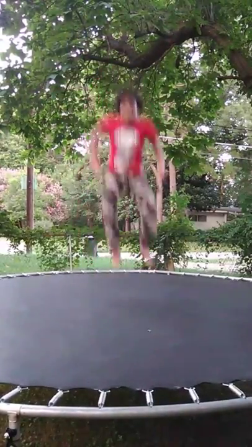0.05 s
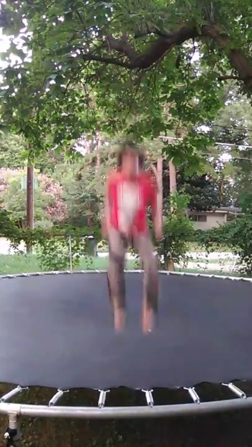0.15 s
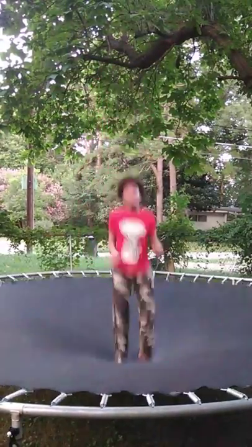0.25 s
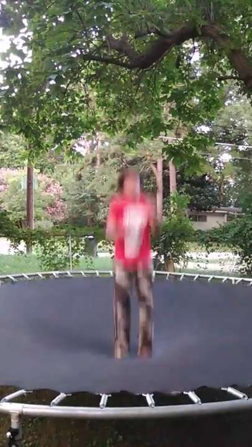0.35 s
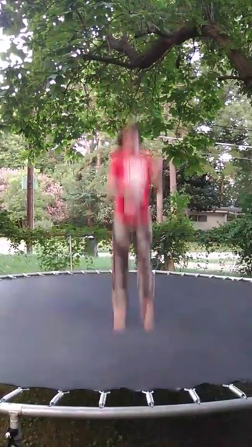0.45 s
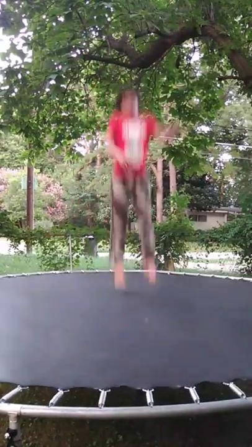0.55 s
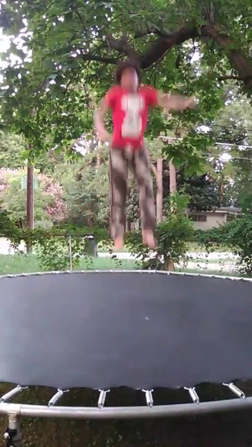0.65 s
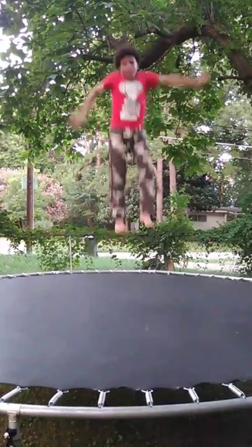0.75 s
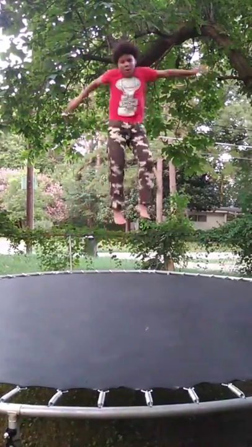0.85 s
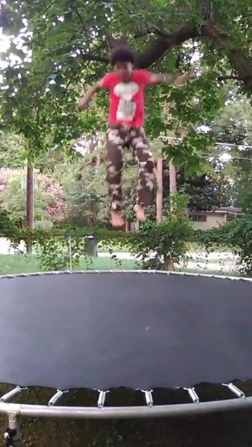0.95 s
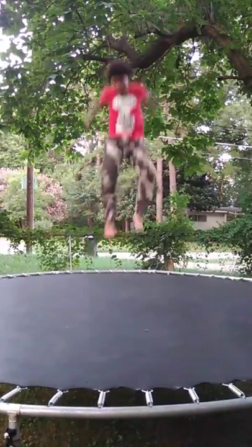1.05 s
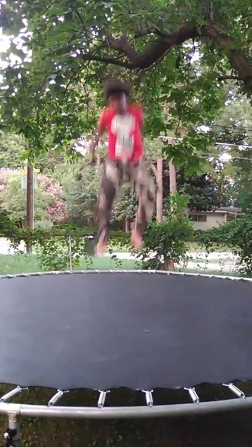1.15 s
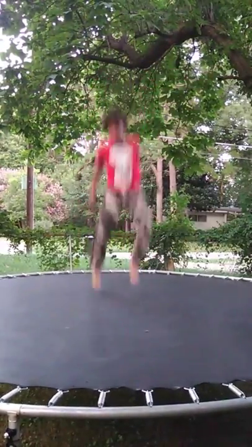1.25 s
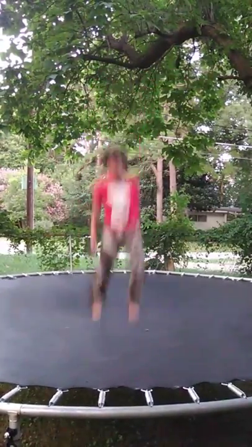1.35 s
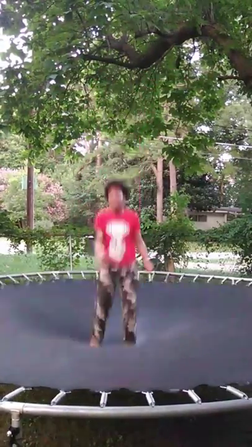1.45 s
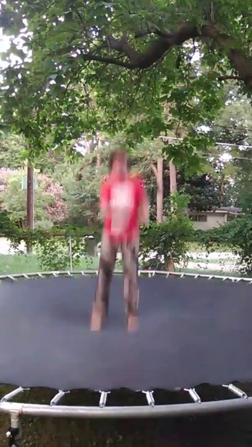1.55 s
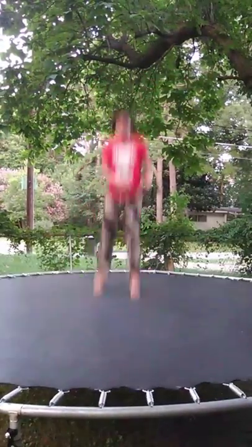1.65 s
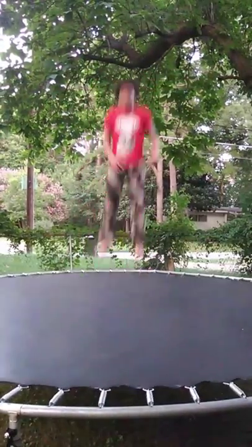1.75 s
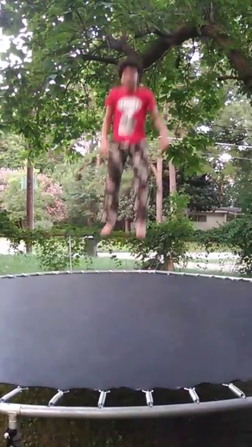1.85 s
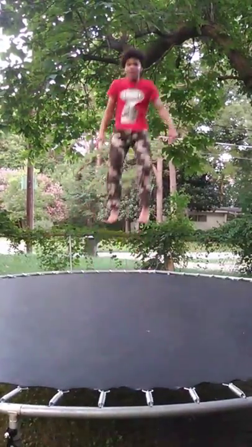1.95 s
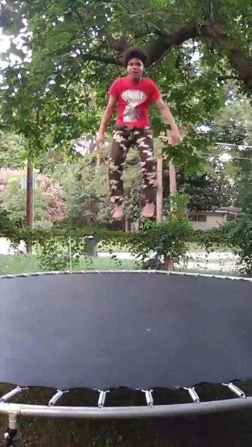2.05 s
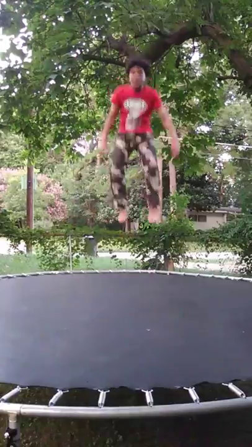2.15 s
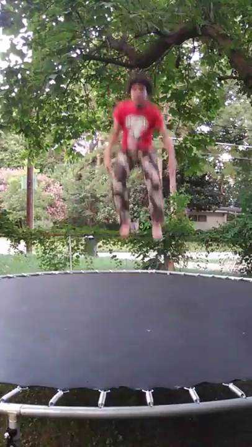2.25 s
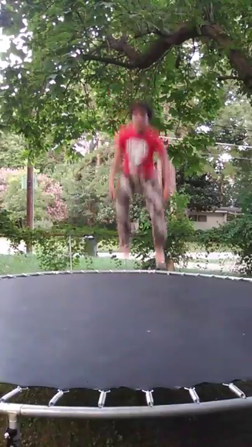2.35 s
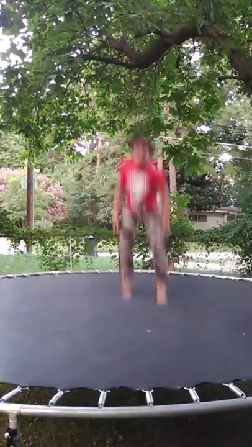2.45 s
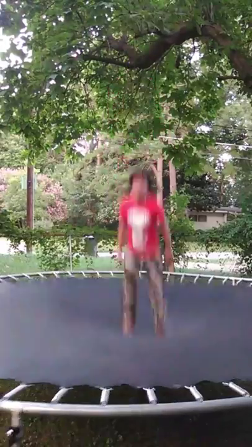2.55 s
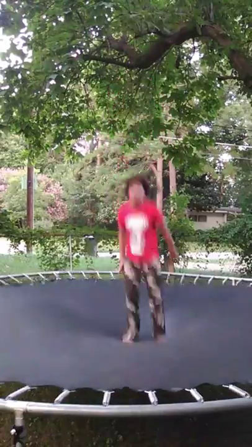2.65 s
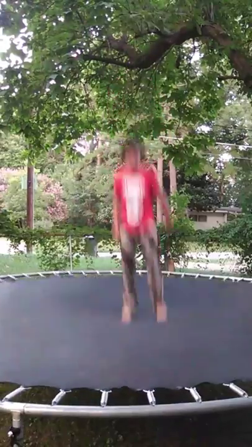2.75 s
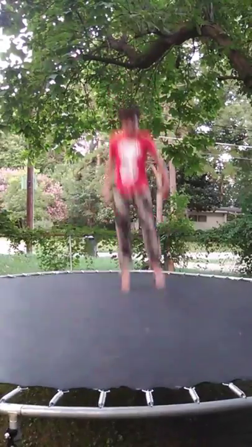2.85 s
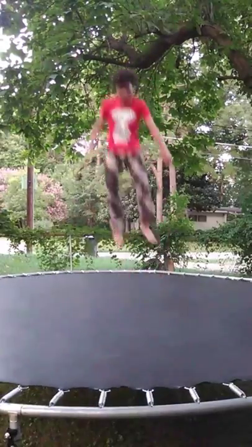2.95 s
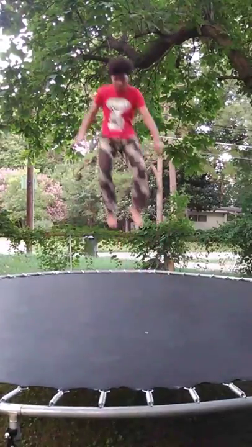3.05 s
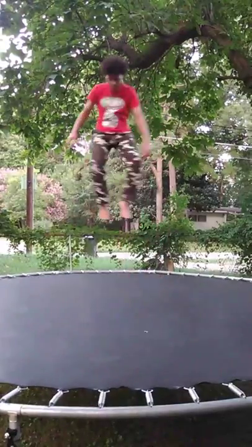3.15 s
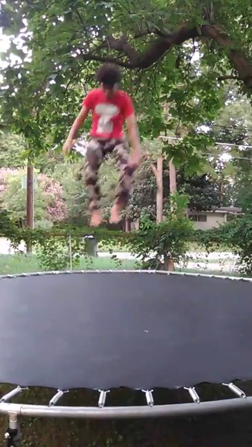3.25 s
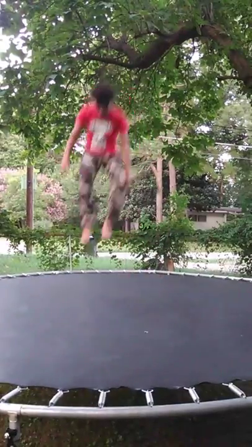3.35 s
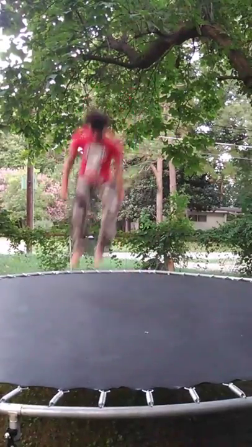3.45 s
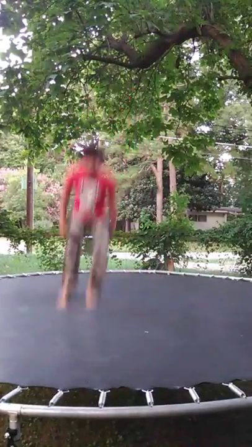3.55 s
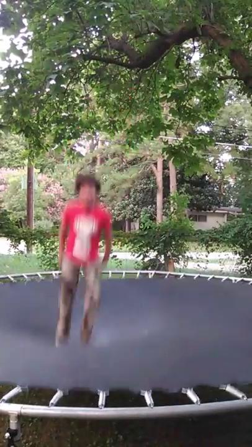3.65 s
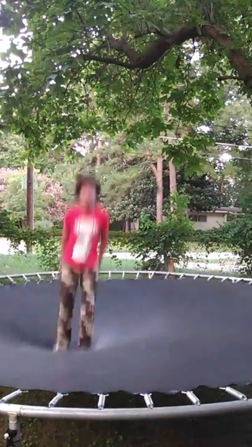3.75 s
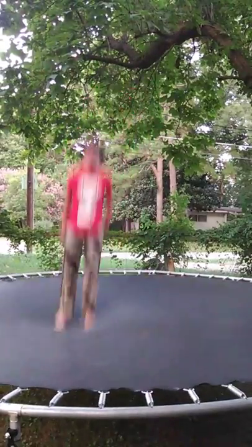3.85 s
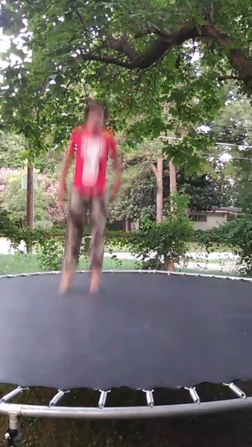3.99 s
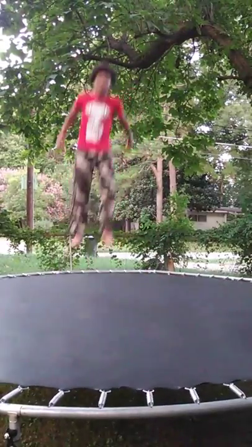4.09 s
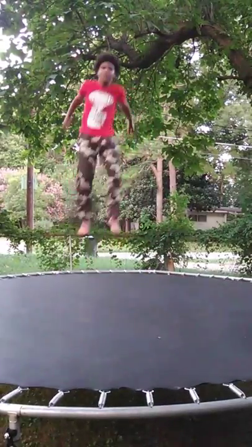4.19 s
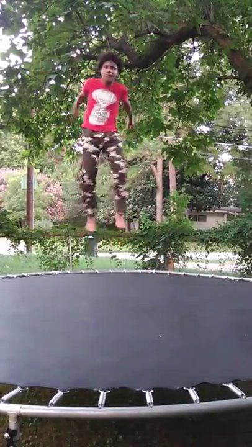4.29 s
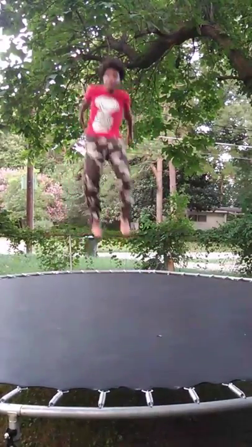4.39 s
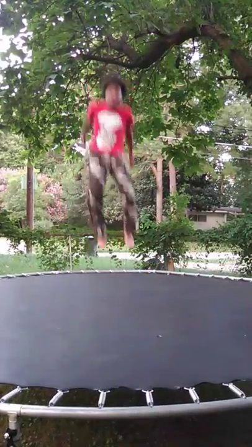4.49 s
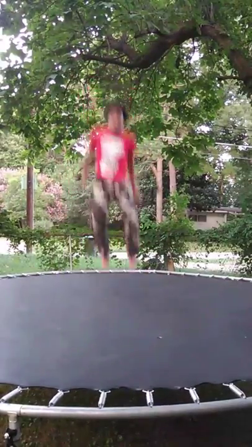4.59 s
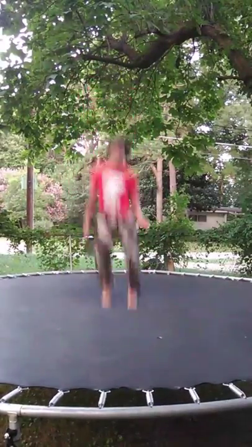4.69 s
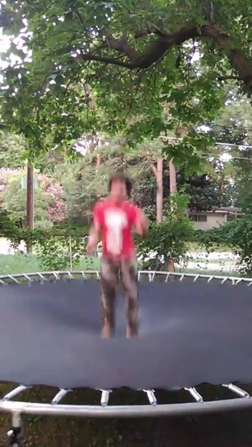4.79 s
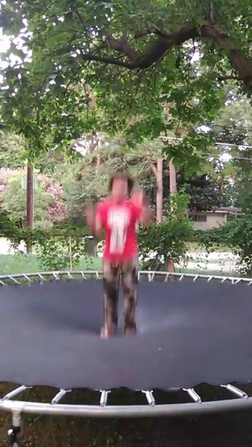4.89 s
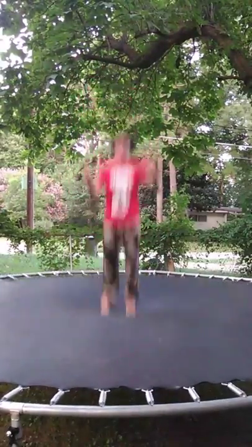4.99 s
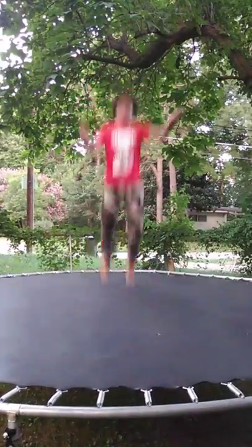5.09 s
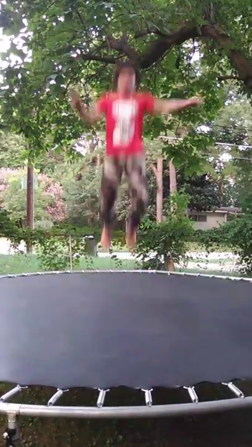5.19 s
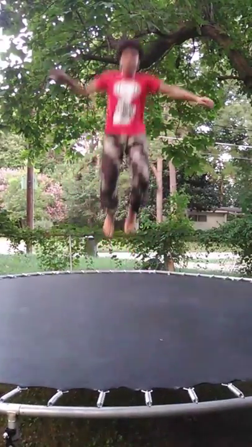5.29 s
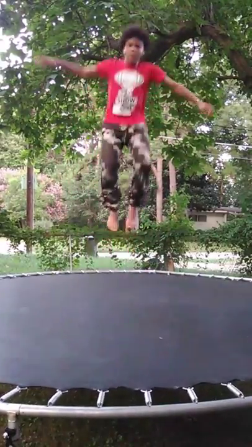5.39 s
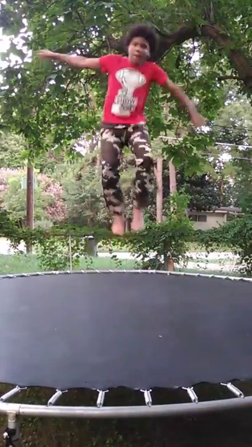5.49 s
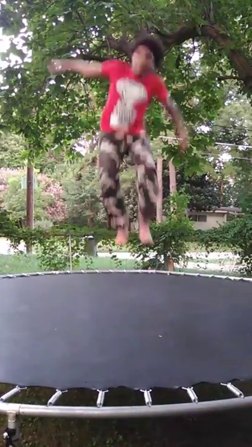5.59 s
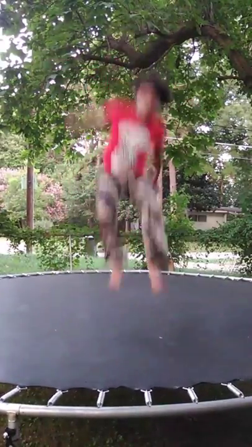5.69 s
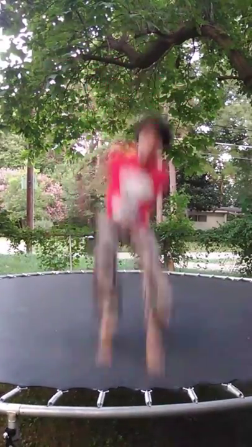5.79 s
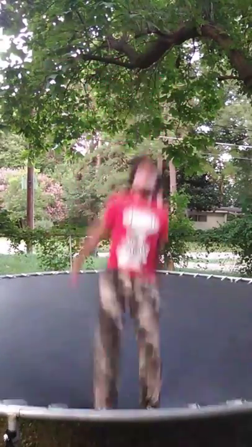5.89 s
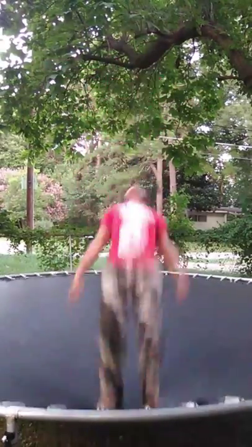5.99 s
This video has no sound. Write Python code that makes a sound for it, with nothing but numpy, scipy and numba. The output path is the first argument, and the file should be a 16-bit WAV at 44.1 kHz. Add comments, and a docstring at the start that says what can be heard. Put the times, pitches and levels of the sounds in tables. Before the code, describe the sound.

Close to the rim of a garden trampoline, steel springs rasp brightly as someone lands, then again as the mat flings them up. Weaker jingles follow while the empty mat swings. Six landings come about 1.1 seconds apart, with soft foot pats, a low mat groan and occasional dull thuds. Quiet outdoor air and a faint far machine hum lie behind.

```python
"""A bright metallic rasp surges and fades as someone bounces on a garden trampoline, six landings about 1.1 s apart.
Stick-slip friction of the steel springs in their hooks is a train of uneven impulses that excites hooks,
coils, mat and frame: a burst as the springs stretch, another as they let go, weaker ones as the empty mat swings.
Feet pat the mat as swept noise, the frame thuds as damped sines of sinking pitch, hooks squeak as wavering sines,
and behind them lie the filtered noise of the yard and the sines of a machine humming far off."""
import sys
import numpy as np
from scipy import signal
from scipy.fft import rfft, irfft
from scipy.io import wavfile
from scipy.ndimage import map_coordinates
from numba import njit

SR = 44100
rng = np.random.default_rng(int(sys.argv[2]) if len(sys.argv) > 2 else 0)


def generate_wav(signal):
    """Clip the signal to [-1, 1] and save it as 16-bit WAV at the path in sys.argv[1]."""
    frames = np.transpose(np.atleast_2d(signal))
    scaled = np.clip(frames, -1, 1) * 32767
    pcm = np.round(scaled).astype(np.int16)
    wavfile.write(sys.argv[1], SR, pcm)


N = 265923
T = np.arange(N) / SR
BRIEF = T[:SR // 2]  # age of a short sound, s

# landings: the feet press the mat down and the springs stretch; levels are nominal
# start_s, attack_s, length_s, rasp_db, deepest_after_s, depth (0-1), groan_db before its high-pass, soles_db
LANDINGS = [(0.197, 0.063, 0.15, -22.5, .128, .8, -40, -62),
            (1.349, 0.082, 0.17, -22.5, .167, .87, -38, -67),
            (2.517, .056, 0.14, -23, .117, 0.8, -38.5, -61),
            (3.628, .075, 0.14, -23, .138, 0.98, -35, -57.5), (4.751, .07, .147, -22, .134, 1, -37, -56.5),
            (5.845, 0.063, 0.13, -19, 0.11, .95, -33, -58)]
# recoils: the springs let go and fling the mat up; levels are nominal
# start_s, attack_s, length_s, rasp_db, fade_db_per_s, lift (0-1), groan_db before its high-pass
RECOILS = [(0.414, 0.082, 0.35, -17.5, 66.5, .6, -44), (1.585, .038, 0.22, -21.5, 46, 0.34, -36),
           (2.717, .048, 0.23, -21.5, 54, 0.64, -46), (3.866, .02, .275, -22.5, 52, .5, -39.5),
           (4.977, .048, .348, -21, 50, 0.5, -45)]


def undb(db):
    """Decibels to amplitude ratio: 20 dB is a factor of ten."""
    return 10 ** (np.asarray(db) / 20)


def unit(x):
    """Normalise the mean power: scale to rms 1."""
    return x / np.sqrt(np.mean(x ** 2))


def energy_one(response):
    """Unit-energy response: white noise passes with its power unchanged."""
    return response / np.linalg.norm(response)


def walk(rate):
    """Band-limited random wander: normal values, rate per second, joined by straight lines."""
    points = rng.standard_normal(1024)
    return np.interp(T * rate, np.arange(len(points)), points)


def convolve(x, response):
    """Linear superposition: every sample of x launches the impulse response."""
    return signal.fftconvolve(x, response)[:N]


def add(out, s, sound):
    """Superposition: mix a short sound in at time s."""
    start = int(s * SR)
    out[start:start + len(sound)] += sound[:N - start]


def colour(x, points, size=4096):
    """Minimum-phase filter: the folded cepstrum makes a causal response with the given (Hz, dB) outline."""
    hz, db = np.transpose(points)
    freqs = np.maximum(np.fft.rfftfreq(size, 1 / SR), 1)
    outline_db = np.interp(np.log(freqs), np.log(hz), db)
    cepstrum = irfft(np.log(undb(outline_db)))
    # fold the later half onto the earlier one
    cepstrum[1:size // 2] *= 2
    cepstrum[size // 2 + 1:] = 0
    return convolve(x, irfft(np.exp(rfft(cepstrum))))


def band(x, hz, width):
    """Band-pass resonance around hz, width in Hz."""
    edges = np.clip([hz - width / 2, hz + width / 2], 15, .48 * SR)
    return signal.sosfilt(signal.butter(2, edges, "band", fs=SR, output="sos"), x)


@njit
def high_pass(x, hz, damping):
    """Second-order state-variable high-pass: two integrators whose corner frequency may move."""
    y, b, l = np.empty(len(x)), 0., 0.  # b, l: integrator states
    for i in range(len(x)):
        g = np.tan(np.pi * hz[i] / SR)
        v = (b + g * (x[i] - l)) / (1 + g * (g + damping))
        y[i] = x[i] - damping * v - (l + g * v)
        b, l = 2 * v - b, l + 2 * g * v
    return y


def yard():
    """Filtered noise for still outdoor air; close low sines beat as the hum of a far machine."""
    # outline of the air: pitch_hz, level_db (relative)
    air_outline = [(25, -9.5), (55, 1.5), (110, -7.5), (200, -5), (380, -12.5), (750, -12.5), (1400, -26),
                   (2400, -24.5), (3600, -28), (6000, -35), (7700, -9.5), (10000, -41), (15500, -45)]
    # tones of the machine: pitch_hz, rms_db, both before their wander
    hum_tones = [(58.5, -74.5), (90, -72), (119, -76.5), (147, -79)]
    air_db = -69 + .9 * walk(4.9)
    air = undb(air_db) * unit(colour(rng.standard_normal(N), air_outline))
    hum = np.zeros(N)
    for hz, db in hum_tones:
        gain = undb(db + 1.6 * walk(2.2)) * np.sqrt(2)  # rms to peak
        phase = np.cumsum(hz + .9 * walk(1.8)) / SR
        hum += gain * np.sin(2 * np.pi * phase)
    return air + hum


def squeaks(waver=.011):
    """Regular stick-slip: for a moment a hook slips evenly enough to sing a wavering sine."""
    # mid_s, pitch_hz before the waver, peak_db, half_length_s
    squeak_events = [(2.74, 2076, -40, .014), (2.76, 1517, -37.5, 0.016)]
    out = np.zeros(N)
    for s, hz, db, length in squeak_events:
        phase = np.cumsum(hz * (1 + waver * walk(300))) / SR
        out += undb(db) * np.exp(-((T - s) / length) ** 2) * np.sin(2 * np.pi * phase)
    return out


def blow(hz, db, length, sag=0.67, cloth_db=-5):
    """Struck damped oscillator: a few cycles that start at hz and sink, with a dull noise flap of cloth."""
    age = BRIEF / length
    cycles = hz * length * (age * (1 - sag) + sag * 2 * (1 - np.exp(-age / 2)))
    swing = np.sin(2 * np.pi * cycles)
    flap = unit(band(rng.standard_normal(len(age)), hz, hz * 0.81))
    envelope = 2 * age * np.exp(1 - 2 * age)  # peak 1 at half the length
    return undb(db) * envelope * (swing + undb(cloth_db) * flap)


def thuds():
    """Impact excitation: hard landings jolt the frame, a knock then a boom; the empty mat flaps softly."""
    # start_s, knock_pitch_hz, knock_db, boom_pitch_hz, boom_db, boom_length_s (pitches at the start)
    frame_jolts = [(0.303, 272, -50, 98, -39, 0.017), (2.616, 208, -39, 100, -47.5, 0.047),
                   (3.604, 140, -53, 120.8, -51.5, .04), (5.841, 184.8, -33.5, 124.2, -39.5, 0.03),
                   (5.958, 150, -48.5, 78.06, -40, 0.035)]
    # soft low flaps while the mat swings empty: start_s, level_db
    mat_flaps = [(4.18, -51.5), (4.232, -49), (4.319, -52), (4.352, -50), (4.387, -51)]
    knock_s, boom_delay_s = 0.013, .007
    flap_hz, flap_s = 107, 0.017
    out = np.zeros(N)
    for s, knock_hz, knock_db, boom_hz, boom_db, length in frame_jolts:
        add(out, s, blow(knock_hz, knock_db, knock_s))
        add(out, s + boom_delay_s, blow(boom_hz, boom_db, length))
    for s, db in mat_flaps:
        add(out, s, blow(flap_hz, db, flap_s))
    return out


def footfalls(length=.026, climb=0.29, climb_time=0.017, spread=0.73):
    """Tension raises pitch: soles brush the mat as band noise that climbs while the cloth tightens."""
    foot_lead_s, foot_hz = 0.026, 311.6  # soles touch before the springs slip; pitch before the climb
    out = np.zeros(N)
    # noise read ever faster rises in pitch
    clock = np.cumsum(1 + climb * (1 - np.exp(-BRIEF / climb_time))) / SR
    envelope = np.sqrt(2 * np.e * BRIEF / length) * np.exp(-BRIEF / length)
    for s, *_, db in LANDINGS:
        noise = unit(band(rng.standard_normal(len(BRIEF)), foot_hz, foot_hz * spread))
        brush = np.interp(clock, BRIEF, noise)
        add(out, s - foot_lead_s, undb(db) * envelope * brush)
    return out


def stroke(s, attack, length, db, slope):
    """Friction envelope: slipping sets in, lasts while its level slopes (dB per s), then dies away."""
    release_db_per_s = 205
    age = np.maximum(T - s, 0)
    onset = np.sin(np.pi / 2 * np.minimum(age / attack, 1)) ** 2
    held_db = db + slope * np.minimum(age, length)
    return onset * undb(held_db - release_db_per_s * np.maximum(age - length, 0))


def jingle(per_s=32, jump_db=3.0, fade=.014):
    """Random relaxation: now and then a spring jerks loose and settles again exponentially."""
    jerks = (rng.random(N) < per_s / SR) * rng.uniform(.5, 1, N)
    lift = convolve(jerks, np.exp(-BRIEF / fade))
    return undb(jump_db * np.minimum(lift - lift.mean(), 1))


def motion():
    """Incoherent sources add in power: all strokes give the hook and coil levels in dB, before stretch acts."""
    # swings of the empty mat shake the slack springs; levels are nominal
    # start_s, attack_s, length_s, rasp_db, coil_db relative to the hooks
    swing_events = [(0.027, 0.043, .087, -34.5, -18.5), (0.771, .022, 0.095, -33, -16.5),
                    (1.114, 0.071, 0.07, -52.5, -13.5), (1.348, 0.0061, 0.028, -42, -24.5),
                    (1.901, 0.036, 0.092, -42, -11), (1.976, 0.031, 0.14, -34.5, -13.5),
                    (2.33, .02, .076, -43.5, -18), (2.511, 0.0069, .015, -46, -18),
                    (3.012, 0.019, .1, -46, -17), (3.108, 0.033, .11, -42, -15),
                    (3.205, 0.018, 0.041, -37.5, -18), (4.208, .016, 0.13, -38, -11.5),
                    (4.313, .012, 0.13, -37.5, -8.5), (4.589, .016, .029, -39, -11.5),
                    (4.634, .016, .032, -35.5, -16), (4.683, 0.0061, 0.092, -35, -13.5),
                    (5.166, 0.027, 0.094, -37, -17.5), (5.444, .032, 0.12, -35, -18),
                    (5.782, 0.0067, 0.041, -40.5, -21)]
    # the rasp grows while the mat sinks; coils sound below the hooks
    press_db_per_s, swing_fade_db_per_s = 19, 18
    press_coil_db, recoil_coil_db = -12, -12.5
    coil_lag_s = 0.0062
    strokes = []
    for s, attack, length, db, *_ in LANDINGS:
        strokes.append((stroke(s, attack, length, db, press_db_per_s), press_coil_db))
    for s, attack, length, db, fade, _, _ in RECOILS:
        strokes.append((stroke(s, attack, length, db, -fade), recoil_coil_db))
    for s, attack, length, db, coil_db in swing_events:
        strokes.append((stroke(s, attack, length, db, -swing_fade_db_per_s), coil_db))
    uneven = jingle()
    hooks = uneven * np.sqrt(sum(strength ** 2 for strength, _ in strokes))
    coils = uneven * np.sqrt(sum((strength * undb(coil_db)) ** 2 for strength, coil_db in strokes))
    # the coils follow the hooks a little late
    lag = np.exp(-BRIEF / coil_lag_s)
    late_coils = convolve(coils, lag / lag.sum())
    return 20 * np.log10(np.maximum([hooks, late_coils], 1e-5))


def swell(s, rise, fall):
    """Asymmetric Gaussian pulse that peaks at s with its own rise and fall."""
    return np.exp(-((T - s) / np.where(T < s, rise, fall)) ** 2)


def load():
    """Elastic loading: stretch of the mat and gain of its groan swell as it is pressed down and flung up."""
    # a press builds slowly and is shed quickly
    press_rise_s, press_fall_s = .08, .048
    # the flung mat is tautest shortly after it lets go
    lift_delay_s, lift_rise_s, lift_fall_s = 0.064, 0.046, 0.16
    swells = []
    for s, *_, deepest, depth, db, _ in LANDINGS:
        swells.append((swell(s + deepest, press_rise_s, press_fall_s), depth, db))
    for s, *_, lift, db in RECOILS:
        swells.append((swell(s + lift_delay_s, lift_rise_s, lift_fall_s), lift, db))
    stretch = sum(bell * depth for bell, depth, _ in swells)
    groaning = sum(bell * undb(db) for bell, _, db in swells)
    return stretch, groaning


def slips(rasp_db, slip_hz, speed_up, wander, scatter_db, share_db, count=6):
    """Stick-slip impulse trains: each spring has its own uneven rhythm, faster when it moves harder."""
    out = np.zeros(N)
    pace = slip_hz * undb(speed_up * (rasp_db - rasp_db.max()))  # slip_hz holds at the strongest rasp
    for _ in range(count):
        rate = pace * np.exp(wander * (walk(14) + walk(170)))
        cycles = np.cumsum(rate) / SR + rng.random()
        at = np.flatnonzero(np.diff(np.floor(cycles)))  # a slip at each whole cycle
        chance = rng.uniform(-1, 1, (N // 8, 2))[:len(at)]
        size_db = scatter_db * chance[:, 0] + share_db * walk(25)[at]  # the springs take turns in leading
        # denser slips are smaller, which keeps the power even
        out[at] += np.sign(chance[:, 1]) * undb(size_db) / np.sqrt(rate[at])
    return unit(out)


def dense_modes(t60):
    """High modal density: very many close modes sum to noise with one exponential decay (t60 in s)."""
    return rng.standard_normal(len(BRIEF)) * np.exp(-np.log(1000) * BRIEF / t60)


def ring_detuned(ticks, response, tuning):
    """Time warping: ring a response in stretched time, so that all its modes slide by the factor tuning."""
    clock = np.cumsum(tuning)
    rung = signal.fftconvolve(np.bincount(clock.astype(int), ticks), response)
    return map_coordinates(rung, [clock], order=3)


def catches(fade=.003):
    """Sudden release: a hook catches and lets go, a sharp scrape that decays exponentially (gain over time)."""
    # start_s, level_db (nominal)
    catch_events = [(.216, -46), (.786, -34), (2.537, -29), (3.228, -42), (3.883, -32), (4.688, -33),
                    (5.859, -31)]
    out = np.zeros(N)
    for s, db in catch_events:
        add(out, s, undb(db) * np.exp(-BRIEF / fade))
    return out


def clumps(x, patchy_db, patch_hz, patch_s, size=512):
    """Intermittent contact: short resonances come and go as different turns of wire touch."""
    hz, s, spectra = signal.stft(x, SR, nperseg=size)
    places = np.meshgrid(hz / patch_hz, s / patch_s, indexing="ij")
    field = map_coordinates(rng.standard_normal((160, 400)), places, order=1, mode="mirror")
    patchy = spectra * undb(patchy_db * field.clip(-2, 1))
    return unit(signal.istft(patchy, SR, nperseg=size)[1][:N])


def groan(ticks, stretch, strength, slack_hz=1050, taut_hz=340, damping=1.81):
    """Membrane radiation: the taut mat sounds the slips like a drum skin, lower the deeper it is pressed."""
    # colour of the slips as the mat radiates them: pitch_hz, level_db (relative, before the high-pass)
    mat_colour = [(150, -15), (300, -1), (500, 3), (650, 0), (800, 0), (980, 3), (1200, -3), (1500, -5.5),
                  (1900, -10.5), (3000, -35)]
    corner_hz = np.clip(slack_hz * (taut_hz / slack_hz) ** stretch, 100, 4000)
    once = high_pass(unit(colour(ticks, mat_colour)), corner_hz, damping)
    return strength * high_pass(once, corner_hz, damping)


def springs(glide=.02, drift=.025):
    """Source and resonator: slips hiss at the hooks, sound coils and loaded mat, and leave the steel ringing."""
    # colour of a slip at the hook: pitch_hz, level_db (relative)
    hook_colour = [(2500, -48), (4200, -26), (5400, -13), (6100, -11.5), (7000, -3), (7850, 1.5),
                   (8400, -2), (9100, -10.5), (10000, -18), (13000, -18), (14800, -22), (15700, -29)]
    # colour of a slip in the coil: pitch_hz, level_db (relative)
    coil_colour = [(450, -23.5), (850, -8), (1150, -3), (1500, -2), (1850, -2.5), (2450, 1.8), (3150, -1.2),
                   (3750, 1.2), (4400, -1), (5500, -19.5), (8000, -37.5)]
    # lasting rings of the steel: pitch_hz, width_hz, t60_s, level_db relative to the drive
    steel_rings = [(2480, 340, .5, -24.5), (7720, 900, .3, -17), (13080, 120, .35, -27)]
    coil_t60_s, frame_t60_s = .13, .12
    taut_coil_db = -1  # coil level change at stretch 1
    rasp_db, coil_db = motion()
    stretch, groaning = load()
    ticks = slips(rasp_db, slip_hz=520.4, speed_up=.2, wander=.35, scatter_db=2.0, share_db=1.34)

    # the coils' close modes slide as they stretch; those of the frame stay put
    tuning = np.exp(glide * stretch + drift * walk(3))
    coil_ring = ring_detuned(ticks, energy_one(dense_modes(coil_t60_s)), tuning)
    frame_ring = convolve(ticks, energy_one(dense_modes(frame_t60_s)))
    ringing = ticks + undb(-4.5) * coil_ring + undb(-12) * frame_ring
    ticks = clumps(ringing, patchy_db=2.5, patch_hz=172.0, patch_s=.022)

    scrapes = catches()
    hook_gain = undb(rasp_db + 0.05) + scrapes
    hook = hook_gain * unit(colour(ticks, hook_colour))
    coil_gain = undb(coil_db + taut_coil_db * stretch) + undb(-12) * scrapes
    coil = coil_gain * unit(colour(ticks, coil_colour))

    # taut springs ring more freely
    drive = ticks * undb(rasp_db + 8 * (stretch - 1.5))
    rings = np.zeros(N)
    for hz, width, t60, db in steel_rings:
        ring = convolve(drive, band(dense_modes(t60), hz, width))
        rings += undb(db) * drive.std() * unit(ring)

    # the mat is tugged by other springs, all round the rim
    tugs = slips(rasp_db, slip_hz=170.64, speed_up=.2, wander=.4, scatter_db=4.5, share_db=1.5)
    return hook + coil + groan(tugs, stretch, groaning) + rings


def scene():
    """Superposition of yard and trampoline at one microphone close to the rim."""
    return (yard() + squeaks() + thuds() + footfalls() + springs())[None]


def record(dry, ceiling=0.65):
    """Saturation and band limiting: tanh rounds the highest peaks, a steep low-pass cuts the top."""
    top_hz = 15550
    low_pass = signal.ellip(10, .2, 80, top_hz, fs=SR, output="sos")
    return signal.sosfilt(low_pass, ceiling * np.tanh(dry / ceiling))


dry = scene()
out = record(dry)
generate_wav(out)
```